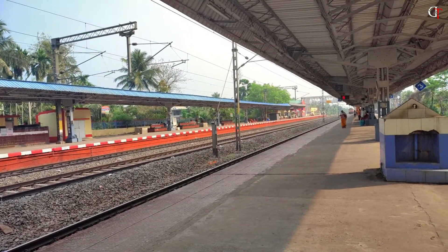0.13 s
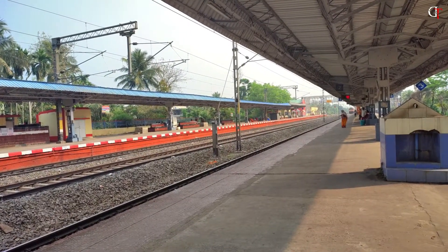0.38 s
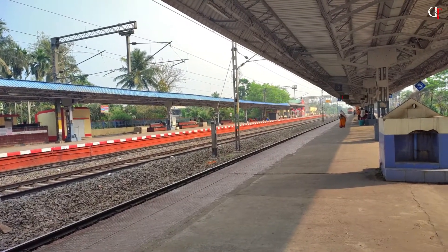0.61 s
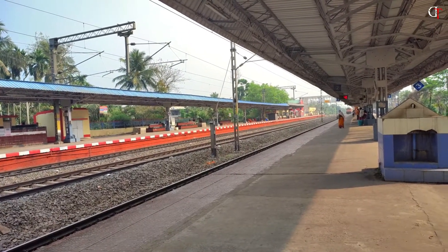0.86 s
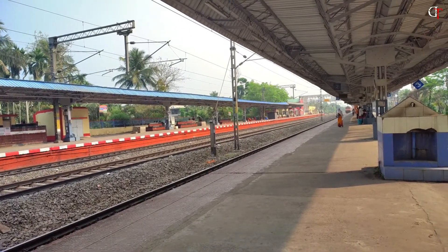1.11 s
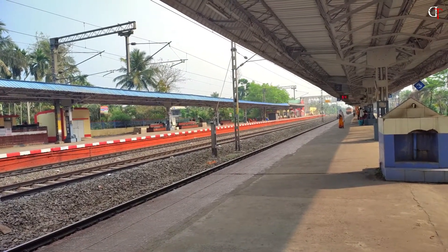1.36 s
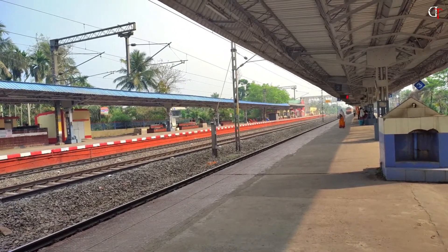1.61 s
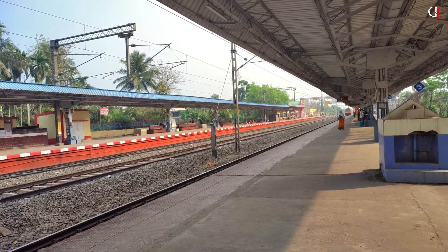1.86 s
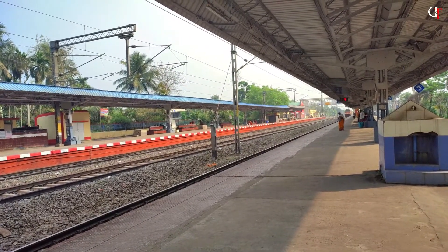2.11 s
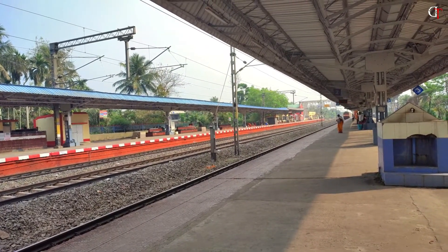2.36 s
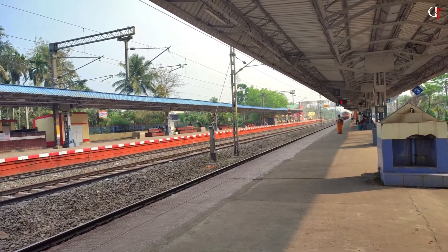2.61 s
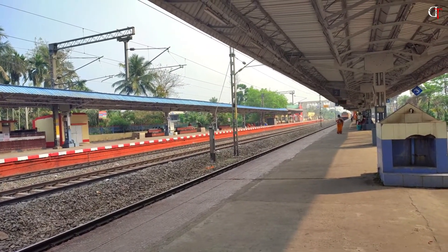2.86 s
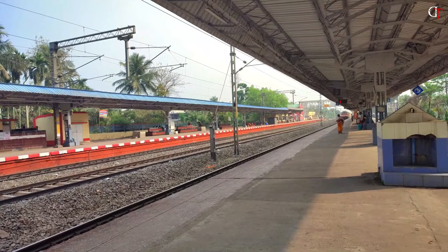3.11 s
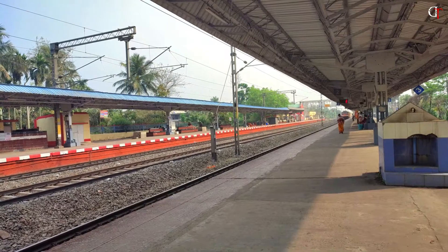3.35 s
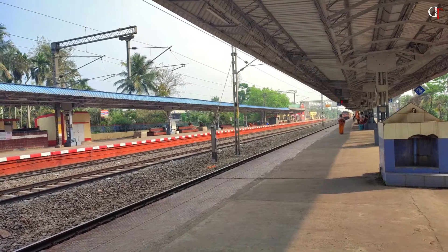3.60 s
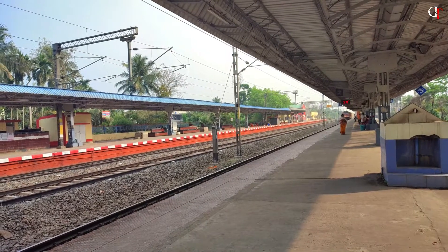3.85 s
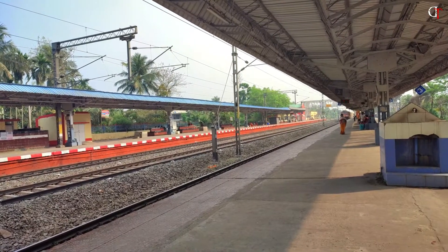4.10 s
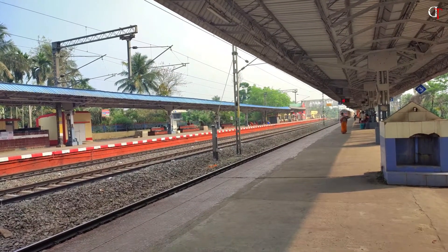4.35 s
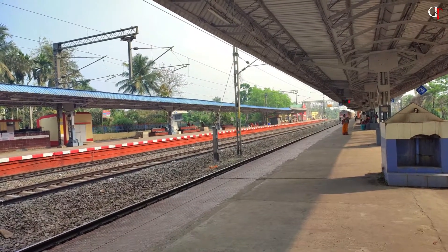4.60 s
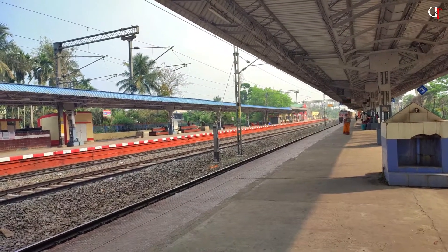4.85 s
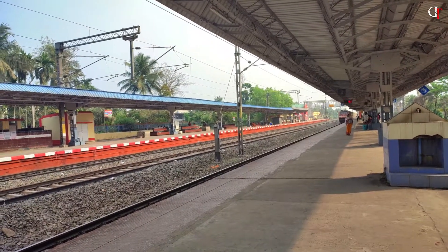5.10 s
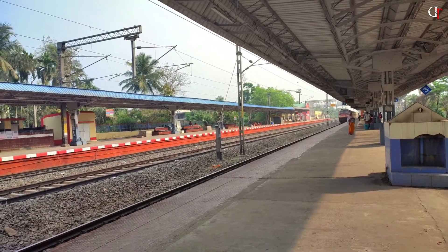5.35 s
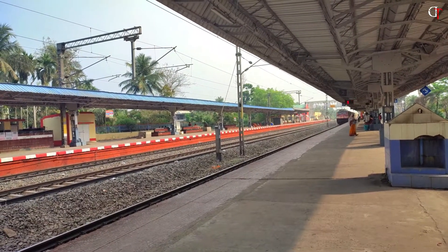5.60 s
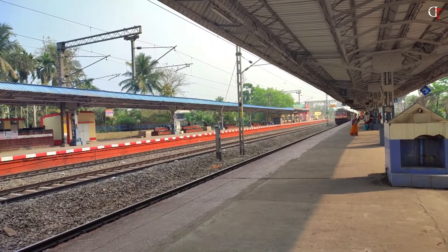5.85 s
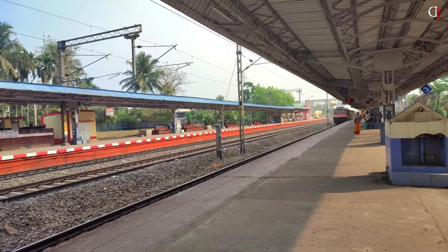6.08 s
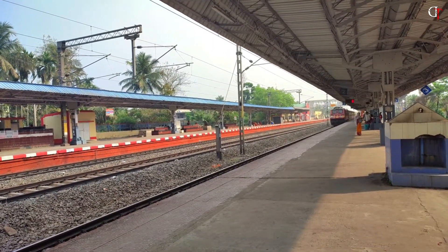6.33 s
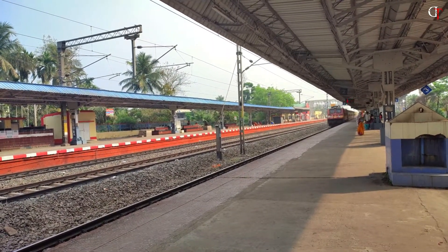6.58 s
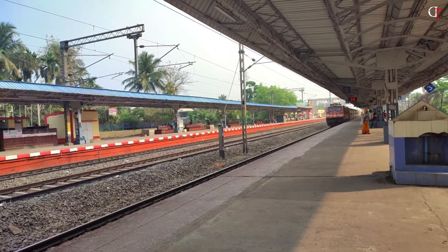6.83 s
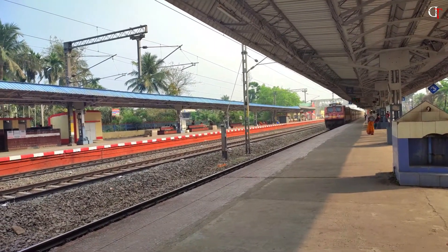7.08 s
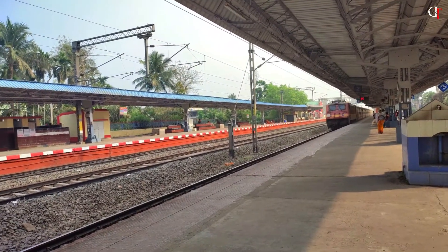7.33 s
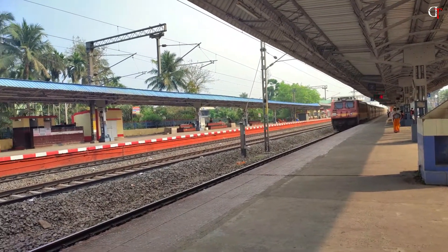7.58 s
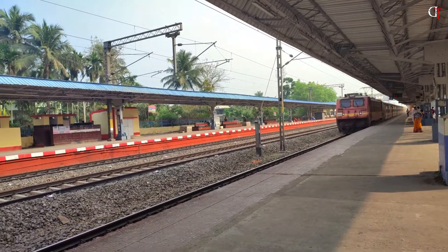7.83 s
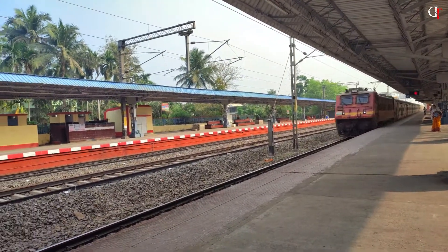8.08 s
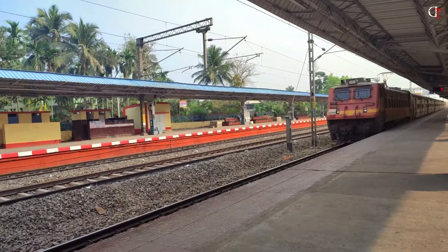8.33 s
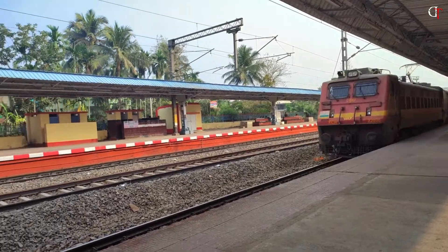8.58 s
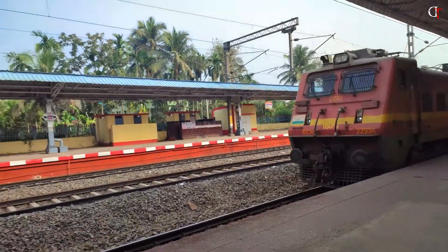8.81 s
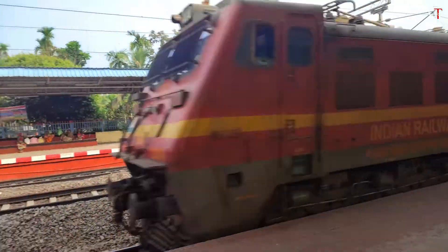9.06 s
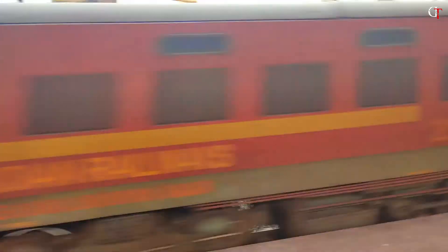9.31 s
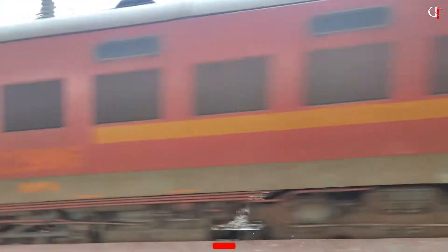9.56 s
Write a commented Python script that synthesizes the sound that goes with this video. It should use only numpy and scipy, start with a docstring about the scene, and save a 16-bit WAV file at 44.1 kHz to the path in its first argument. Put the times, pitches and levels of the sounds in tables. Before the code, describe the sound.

Stereo handheld microphone close to the track at an open-sided station. A single-note train horn, faint and hazy at first, blows again and again, becoming harsh and loud. Between blasts its echo fades into soft track rumble, with a thin high squeal early on. The engine arrives abruptly, the horn cuts off with a small pitch drop, and heavy wheel noise surges, with a wind thump, brief hums and a metallic knock on a rail joint.

```python
"""An air horn is heard first, already sounding: an electric express gives long blasts as it nears a roofed
platform, then roars past. The horn is a harmonic sum whose partials swell and fade as drifting paths interfere;
walls behind the train return a lower echo, and the station adds sparse reflections. Shaped noise makes the
wheels, the far rolling and the wind on the microphones; unsteady sines make a thin squeal and short hums;
damped sines ring where a wheel strikes a rail joint."""
import sys
import numpy as np
from scipy import signal
from scipy.io import wavfile
from scipy.ndimage import uniform_filter1d

SR = 44100
rng = np.random.default_rng(int(sys.argv[2]) if len(sys.argv) > 2 else 0)


def put_to_file(sound):
    """Save the sound as 16-bit audio at rate SR, in the file named by the first command-line argument."""
    columns = np.atleast_2d(sound).T  # one column per channel
    safe = np.clip(columns, -1, 1)
    whole_steps = np.round(safe * 32767)
    wavfile.write(sys.argv[1], SR, whole_steps.astype(np.int16))


def invert_db(x):
    """Field ratio 10**(x/20) for x, a level in decibels (scalar or array-like)."""
    u = np.asarray(x, float) / 20
    return 10 ** u


N = 427329
TIME = np.arange(N) / SR  # s
CONTROL = TIME[::64]  # s, times at which slow changes are computed

# Horn: steady pitch as heard, sinking as the train draws level, with a small rise at the end: t/s, f/Hz
PITCH = [(0, 314.6), (2.8, 314.6), (4.7, 315.0), (8.0, 314.7), (8.6, 314.0), (8.85, 312.6), (9.05, 310.4),
         (9.1, 313), (9.2, 313)]
# Air valve: opening t/s, shutting t/s
VALVE = [(-1, 1.375), (1.495, 2.89), (4.693, 5.155), (5.25, 6.955), (7.033, 9.17)]
# Spectrum of the horn heard from near: partial number, level/dB
BELL_NEAR = [(1, 0), (2, -13), (3, -1), (4, -4), (5, -16), (6, -14), (7, -12.5), (8, -12), (9, -20.5),
             (10, -19), (11, -18), (12, -19), (13, -21.5), (14, -28), (15, -27.5), (16, -31.5), (17, -25.5),
             (18, -30), (19, -22), (20, -20), (21, -20.5), (22, -19.5), (23, -20), (24, -22), (25, -25),
             (26, -24.5), (27, -32.5), (28, -30.5), (29, -32), (30, -28.5), (31, -31), (32, -30.5),
             (33, -30.5), (34, -33), (35, -32), (36, -29), (37, -32), (38, -30.5), (39, -32), (40, -29),
             (41, -38), (42, -36), (43, -35), (44, -35), (45, -32)]
# Spectrum of the horn heard from far: partial number, level/dB
BELL_FAR = [(1, -7), (2, -23), (3, 0), (4, -5), (5, -19), (6, -15), (7, -19), (8, -21), (9, -23.5),
            (10, -21.5), (11, -22), (12, -22.5), (13, -24), (14, -26.5), (15, -33.5), (16, -25),
            (17, -29.5), (18, -27.5), (19, -33.5), (20, -27.5), (21, -29.5), (22, -37), (23, -30.5),
            (24, -36.5), (25, -33.5), (26, -41.5), (27, -41.5), (28, -46), (29, -44), (30, -48), (31, -53),
            (32, -45), (33, -47), (34, -53), (35, -50), (36, -52), (37, -53), (38, -53), (39, -57),
            (40, -58), (41, -58), (42, -61), (43, -60), (44, -58), (45, -56)]
# Horn at full pressure: t/s, level/dB added to the spectrum, blend (0 far, 1 near, above 1 beyond near)
APPROACH = [(0, -25.5, 0), (1.2, -25, .2), (1.6, -23, .1), (2.2, -20, .1), (2.85, -17, .15),
            (4.75, -13, .4), (5.5, -13, .6), (6, -13, .9), (6.7, -14, .75), (7.3, -14, 1), (7.8, -15, 1.3),
            (8.2, -17, 1.2), (8.5, -16, 1.3), (8.9, -15.5, 1.35), (9.05, -16, 1), (9.13, -22, .6),
            (9.2, -34, 1)]
# Partials dip or swell as their paths cancel or add: t/s, partial number, width/s, level change/dB
SWELLS = [(0.0, 18, 0.08, -4.9), (0.2, 4, 0.17, -7.7), (0.27, 25, 0.6, -4.0), (0.3, 6, 0.15, 5.9),
          (0.42, 1, 0.3, -4.8), (0.84, 4, 0.1, -16.0), (0.96, 2, 0.5, -6.1), (0.96, 5, 0.08, 7.3),
          (1.04, 3, 0.1, -11.5), (1.08, 12, 0.6, 5.0), (1.11, 9, 0.08, -5.7), (1.32, 38, 0.3, -2.9),
          (1.55, 1, 0.1, -9.3), (1.99, 3, 0.3, 2.9), (2.1, 2, 0.06, -18.7), (2.16, 7, 0.3, 5.6),
          (2.22, 5, 0.08, -9.8), (2.52, 11, 0.3, -3.2), (2.63, 4, 0.1, 4.1), (2.67, 21, 0.6, -6.4),
          (4.78, 1, 0.06, -5.1), (5.04, 38, 0.3, -4.3), (5.1, 3, 0.02, -10.0), (5.13, 6, 0.6, -3.4),
          (5.31, 4, 0.3, 4.1), (5.34, 1, 0.035, -5.7), (5.37, 10, 0.3, 4.8), (5.4, 3, 0.5, -3.3),
          (5.57, 1, 0.06, -10.0), (5.61, 16, 0.3, -4.0), (5.64, 2, 0.5, -8.1), (5.79, 5, 0.15, -11.2),
          (5.86, 4, 0.035, -7.5), (5.91, 1, 0.06, -12.2), (5.97, 30, 0.15, 3.7), (6.0, 3, 0.035, -6.5),
          (6.03, 1, 0.02, -9.0), (6.17, 1, 0.035, 7.4), (6.21, 6, 0.15, -4.4), (6.21, 10, 0.15, -5.7),
          (6.32, 4, 0.06, -12.5), (6.42, 38, 0.6, -5.2), (6.45, 5, 0.15, 5.3), (6.52, 1, 0.02, -13.0),
          (6.6, 1, 0.5, -7.8), (6.66, 3, 0.02, -6.4), (6.85, 1, 0.02, -12.7), (6.85, 4, 0.02, -12.8),
          (6.85, 4, 0.3, -9.6), (7.13, 3, 0.02, -6.7), (7.13, 4, 0.02, -10.1), (7.32, 11, 0.15, -4.5),
          (7.38, 38, 0.08, 2.2), (7.45, 3, 0.02, -12.2), (7.47, 5, 0.08, 6.2), (7.53, 3, 0.02, -8.4),
          (7.56, 30, 0.08, -1.8), (7.62, 3, 0.3, -10.1), (7.66, 1, 0.17, -8.3), (7.7, 2, 0.5, -8.4),
          (7.78, 3, 0.035, -14.5), (7.81, 1, 0.02, -13.5), (7.82, 4, 0.02, -16.1), (7.93, 3, 0.06, 4.6),
          (8.06, 4, 0.17, 3.1), (8.12, 1, 0.1, 4.0), (8.16, 16, 0.15, -4.8), (8.25, 8, 0.6, -3.5),
          (8.25, 30, 0.08, 3.7), (8.25, 38, 0.6, -6.1), (8.33, 3, 0.035, 3.9), (8.41, 1, 0.02, -11.9),
          (8.52, 14, 0.6, 7.1), (8.57, 1, 0.035, 4.7), (8.57, 4, 0.06, -6.3), (8.61, 3, 0.02, -7.1),
          (8.61, 11, 0.08, -4.7), (8.7, 5, 0.3, 4.1), (8.74, 3, 0.1, -5.0), (8.77, 1, 0.06, -9.9),
          (8.88, 30, 0.15, -4.3), (8.91, 4, 0.02, -8.5), (9.02, 3, 0.02, -6.1), (9.06, 2, 0.035, 11.8),
          (9.06, 6, 0.08, 6.5), (9.12, 1, 0.1, 10.0)]
SWELL_REACH = .02  # a swell spreads over SWELL_REACH x partial^2 neighbours
FILL_S, DRAIN_S, TREBLE_LAG = .018, .04, .03  # loudness follows the valve; high partials need more pressure
SHARP_HZ, SETTLE_S, CLIMB_S = 10.5, .05, .09  # the reed runs sharp at low pressure
OPENING_DB, OPENING_S = 5., .1  # the treble overshoots while the reed settles
# Stereo image of the horn: f/Hz, side against mid level/dB
SIDE_DB = [(60, -6), (98, -6), (160, -8), (260, -36.5), (430, -4), (710, 0.5), (1170, -7.5), (1910, 2),
           (3130, 4.5), (5130, 0.5), (8420, -1), (13800, 0.5)]
# Stereo image of the horn: f/Hz, left minus right level/dB
LEAN_DB = [(60, 1.5), (98, 1.5), (160, 0.5), (260, 1.0), (430, 13), (710, 5.5), (1170, -3), (1910, 1.5),
           (3130, -6), (5130, -14.5), (8420, -3), (13800, -9)]
SCATTER_FAR_DB, SCATTER_NEAR_DB = -9., -3.5  # share of each partial scattered by poles, roof and walls
SCATTER_PASS_DB, SCATTER_PASS_S = 7., .3  # more while the engine draws level
# Echo of the horn: partial number, level/dB against the direct one
ECHO_DB = [(1, -16.5), (2, -13.5), (3, -23.5), (4, -28), (5, -28)]
ECHO_RATIO = .868  # sound sent backwards is lowered as much as the direct sound is raised
# Long scattered paths, heard after the valve shuts: f/Hz, level/dB against the direct horn
LATE = [(300, -6), (650, -5), (950, -17), (1300, -16), (1900, -9), (4000, -9), (8000, -8), (14000, -11)]
LATE_BUILD_S, LATE_FADE_S = .08, .19
# Relative spectrum of the horn's air noise: f/Hz, level/dB
BREATH = [(250, -41), (450, -37.5), (800, -28.5), (1200, -24.5), (1700, -48), (3000, -56), (7000, -49),
          (14000, -70)]
BREATH_DB, HISS_LEAD_S = -26, .025  # against the horn's partials; air hisses before the reed speaks

# Reverberation time of the station: f/Hz, t60/s
STATION = [(300, 1.8), (1000, 1.34), (3000, 1.6), (8000, 1.3), (14000, 0.75)]
# Reflections of the station: f/Hz, level/dB against the direct horn
WET = [(300, -12), (700, -20), (1300, -22), (3000, -15), (8000, -18), (14000, -20)]

# Relative spectrum of wheels and bogies close by: f/Hz, level/dB
ROAR = [(18, -28), (30, -23), (190, -11.5), (320, -6), (525, -12.5), (1290, -11.5), (1450, -13),
        (1650, -17.5), (2100, -13.5), (2600, -20), (6900, -30), (8500, -40), (14400, -45.5)]
# Roar: f/Hz, left-right likeness (-1 to 1)
ROAR_SAME = [(60, 0.68), (180, 1), (530, 0.48), (1570, -0.02), (4650, -0.25), (13800, 0.41)]
# the engine's roar peaks at the nearest point, then dies away quickly
ENGINE_PASS_S, ENGINE_DB, SPEED_M_S, TRACK_M = 9.05, -21, 30., 3.2
ENGINE_GONE_S = .2  # decay time after passing
COACH_S, COACH_RISE_S, COACH_TOP_S, COACH_FALL_S = 9.2, .07, 9.55, .1
COACH_DB, COACH_SWELL_DB_S = -11.5, 16.  # level at its top, and the slope up to it

# Wheel over a rail joint: t/s, peak level/dB
JOINT = [(9.478, -.5)]
# Ringing modes of wheel and rail: f/Hz, relative level/dB, t60/s
RAIL = [(328, -7, 0.061), (520, 4, .07), (900, -1, 0.043), (1460, -11, .04), (2540, -12, .03)]

# Short lines while the coach passes, near the horn's note and one higher: start t/s, length/s, f/Hz, level/dB
HUMS = [(9.22, .12, 309, -17), (9.34, .18, 312, -21), (9.52, .2, 296, -19), (9.625, .07, 715, -12.5)]
# A thin squeal that comes and goes: start t/s, length/s, f/Hz, level/dB
SQUEALS = [(.03, .55, 3262, -38), (.62, .13, 3265, -38), (1.7, .42, 3268, -37), (2.15, .3, 3250, -47),
           (2.45, .47, 3255, -39), (2.98, .3, 3250, -44), (3.22, .2, 3250, -52)]
# A second, higher line rings along with the squeal: frequency ratio, level/dB against the first
SQUEAL_PAIR = (1.127, -10.5)

# Relative spectrum of rails and surroundings: f/Hz, level/dB
FAR = [(90, -29), (150, -11), (260, -8.5), (490, -16), (650, -13), (850, -2.5), (1030, 0), (1370, -6),
       (1560, -20), (2500, -25.5), (5800, -45.5), (6500, -32), (7200, -24), (7800, -59), (10500, -43),
       (13300, -35.5), (14600, -38)]
# Far rolling noise: t/s, level/dB
FAR_LEVEL = [(0, -50), (1.5, -40.5), (3, -38.5), (3.8, -37), (4.6, -36), (6, -33), (7.5, -32.5), (9.7, -34)]
# Far rolling and horn air noise: f/Hz, left-right likeness (-1 to 1)
SAME = [(60, 1), (150, 1), (370, 1), (910, 0.35), (2250, -0.35), (5580, 0.83), (13800, 0.092)]
# Relative spectrum of wind on the microphones: f/Hz, level/dB
WIND = [(20, 5), (45, -2.5), (100, -6.5), (200, -24), (300, -15), (600, -70)]
# Gusts: t/s, width/s, level/dB over the steady wind
GUSTS = [(1.9, .4, 2), (3.6, .7, 2), (5.38, .1, 3), (5.75, .15, 6), (6.3, .15, 4), (7.6, .6, 3),
         (8.87, .13, 16), (9.5, .18, 18)]
WIND_DB = -42.5


def horn():
    """Harmonic synthesis: a reed's partials and pulsed air noise, with multipath fading and a Doppler-lowered echo."""
    hz = reed_pitch()
    k = np.transpose(BELL_NEAR)[0]
    db, near = partial_levels(k)
    overshoot_db = OPENING_DB * np.outer(k / len(k), 1 - pressure(CONTROL, OPENING_S, DRAIN_S))
    level = invert_db(db + overshoot_db) * pressure(CONTROL, FILL_S, DRAIN_S) ** (1 + TREBLE_LAG * k[:, None])
    level = uniform_filter1d(level, size=9, axis=1)
    # a moving source reaches fixed reflectors at slightly lower pitch: a skirt that widens with the partial
    spread_hz = 11.56 * np.minimum(k, 14) ** 0.52
    mid, flare = direct_paths(k, level, near, spread_hz)
    # beyond the direct mid signal, the lowest four partials follow a smoother level
    level[:4] = np.sqrt(uniform_filter1d(level[:4] ** 2, size=40, axis=1) + 1e-12)
    partial_hz = k * hz.mean()
    side = side_signal(partial_hz, mid, level * flare, spread_hz)
    echo = back_echo(hz, level) + late_paths(partial_hz, db, spread_hz)
    return partials(hz, mid, side) + echo + breath(hz, level)


def reed_pitch():
    """Pressure-dependent reed frequency: sharp while pressure builds after opening and again as it drains."""
    hz = curve(PITCH, TIME)[0] + SHARP_HZ * (1 - pressure(TIME, SETTLE_S, CLIMB_S))
    return uniform_filter1d(hz, size=400)


def pressure(t, fill_s, drain_s):
    """Exponential charge and discharge: air pressure 0-1 at the reed as the valve opens and shuts."""
    blasts = []
    for opens, shuts in VALVE:
        filling = 1 - np.exp(-np.maximum(t - opens, 0) / fill_s)
        draining = np.exp(-np.maximum(t - shuts, 0) / drain_s)
        blasts.append(filling * draining)
    return np.max(blasts, axis=0)


def partial_levels(k):
    """Interference of paths: dips and swells in dB on a spectrum blended from far to near."""
    near_db, far_db = np.transpose(BELL_NEAR)[1], np.transpose(BELL_FAR)[1]
    db, near = curve(APPROACH, CONTROL)
    db = db + near_db[:, None] * near + far_db[:, None] * (1 - near)
    for s, partial, width, change_db in SWELLS:
        across = bump(k, round(partial), SWELL_REACH * partial ** 2)
        db += change_db * np.outer(across, bump(CONTROL, s, width))
    return db, near


def direct_paths(k, level, near, spread_hz):
    """Multipath fading: narrow random modulation for drifting paths, wider Doppler skirts for scattering."""
    scatter = invert_db(SCATTER_FAR_DB + (SCATTER_NEAR_DB - SCATTER_FAR_DB) * np.minimum(near, 1)
                  + SCATTER_PASS_DB * bump(CONTROL, ENGINE_PASS_S, SCATTER_PASS_S))
    paths = 1 + 0.5 * drift(per_s=3.5, count=len(k), neighbours=0.3)
    skirt = scatter * drift(spread_hz, count=len(k), below=0.28, neighbours=0.27)
    # the bell smears each pulse a little
    phase = .12 * k ** 2 + (0.6 + .02 * k) * rng.standard_normal(len(k))
    flare = np.exp(1j * phase)[:, None]
    mid = level * flare * (paths + skirt) / np.sqrt(.85 + .7 * scatter ** 2)
    # the lowest four partials keep a steady core under their scattering
    mid[:4] = level[:4] * (1.14 + 0.5 * scatter * drift(1.6 * spread_hz[:4], count=4, below=0.44))
    return mid, flare


def side_signal(partial_hz, mid, flared, spread_hz):
    """Interchannel phase: the microphone ports differ in phase, and the in-phase share tilts the image."""
    share, lean = invert_db(read(SIDE_DB, partial_hz)), invert_db(read(LEAN_DB, partial_hz))
    tilt = (lean ** 2 - 1) / (lean ** 2 + 1)
    cosine = np.clip(tilt * (1 + share ** 2) / (2 * share), -1, 1)
    ports = (share * np.exp(1j * np.arccos(cosine)))[:, None]
    diffuse = flared * drift(0.38 * spread_hz, count=len(spread_hz), below=0.27, neighbours=0.37)
    return ports * (0.74 * mid + 0.8 * diffuse)


def back_echo(hz, level):
    """Doppler effect: sound sent backwards returns from the walls at a lower pitch."""
    back = level[:5] * invert_db(np.transpose(ECHO_DB)[1])[:, None]
    mid = back * drift(per_s=7.4, count=5)
    side = 0.25 * back * drift(per_s=5.0, count=5)
    return partials(hz * ECHO_RATIO, mid, side)


def late_paths(partial_hz, db, spread_hz):
    """Delayed scattering: long paths keep the steady note sounding after the valve shuts."""
    late = uniform_filter1d(invert_db(db), size=30, axis=1) * invert_db(read(LATE, partial_hz))[:, None]
    late = late * pressure(CONTROL, LATE_BUILD_S, LATE_FADE_S)
    share = invert_db(read(SIDE_DB, partial_hz))[:, None]
    mid = late * drift(.75 * spread_hz, count=len(db))
    side = share * late * drift(.75 * spread_hz, count=len(db))
    return partials(curve(PITCH, TIME)[0], mid, side)


def breath(hz, level):
    """Modulated flow noise: air passes once each reed cycle, and hisses slightly ahead of the note."""
    effort = np.interp(TIME, CONTROL, np.sqrt((level ** 2).sum(0)))
    effort = np.maximum(effort, np.interp(TIME + HISS_LEAD_S, TIME, effort))
    puff = 1 + 0.89 * np.cos(2 * np.pi * np.cumsum(hz) / SR)
    return invert_db(BREATH_DB) * effort * puff * noise(BREATH, SAME, patchy_db=3.5)


def partials(hz, mid, side):
    """Fourier series: harmonics of a pitch curve with slow complex mid and side strengths."""
    turn = np.exp(2j * np.pi * np.cumsum(hz) / SR)
    wave, out = np.sqrt(2) * np.ones(N), np.zeros((2, N))
    for m, s in zip(mid, side):
        wave = wave * turn  # the next harmonic
        left = (np.interp(TIME, CONTROL, m + s) * wave).real
        right = (np.interp(TIME, CONTROL, m - s) * wave).real
        out += [left, right]
    return out


def station(x):
    """Reverberation by convolution: sparse reflections of roof, platforms and walls, each band with its own t60."""
    size = 2 * SR
    sparse = rng.random((2, size)) < .04
    delayed = np.arange(size) / SR > .025
    taps = rng.standard_normal((2, size)) * sparse * delayed
    hz, t, z = signal.stft(taps, SR, nperseg=256)
    z = z * invert_db(-60 * t / read(STATION, hz)[:, None])
    energy = np.linalg.norm(signal.istft(z, SR, nperseg=256)[1][0])
    tail = signal.istft(z * invert_db(read(WET, hz))[:, None], SR, nperseg=256)[1] / energy
    return signal.fftconvolve(x, tail, axes=1)[:, :N]


def roar():
    """Inverse-distance law: the engine closes in, passes and dies away, then the first coach rushes by."""
    distance = np.hypot(TRACK_M, SPEED_M_S * np.minimum(TIME - ENGINE_PASS_S, 0))
    engine = invert_db(ENGINE_DB) * TRACK_M / distance
    engine = engine * np.exp(-np.maximum(TIME - ENGINE_PASS_S, 0) / ENGINE_GONE_S)
    coach = invert_db(COACH_DB + COACH_SWELL_DB_S * np.minimum(TIME - COACH_TOP_S, 0))
    coach = coach * np.clip((TIME - COACH_S) / COACH_RISE_S, 0, 1)
    coach = coach * bump(np.maximum(TIME, COACH_TOP_S), COACH_TOP_S, COACH_FALL_S)
    return np.hypot(engine, coach) * noise(ROAR, ROAR_SAME, patchy_db=1.5)


def joint():
    """Modal decay: wheel and rail ring briefly after a blow of a few milliseconds."""
    t, out = TIME[:SR // 5], np.zeros(N)
    ring = sum(invert_db(db - 60 * t / t60) * np.sin(2 * np.pi * hz * t) for hz, db, t60 in RAIL)
    ring = ring * (1 - np.exp(-t / 0.0046))
    for s, db in JOINT:
        out[round(s * SR):][:len(t)] += invert_db(db) * ring / abs(ring).max()
    return out


def hums():
    """Narrow-band tones: short lines heard while the coach passes."""
    return tones(HUMS, edge=.4, waver=.6, flutter=.25, pan_db=3.0)


def squeal():
    """Narrow-band tones: a thin squeal with a second line at a fixed frequency ratio."""
    ratio, db = SQUEAL_PAIR
    higher = [(s, length, hz * ratio, level + db) for s, length, hz, level in SQUEALS]
    return tones(list(SQUEALS) + higher, edge=.9, waver=.6, flutter=.45, pan_db=.1)


def tones(rows, edge, waver, flutter, pan_db):
    """Random phase (waver/rad) and amplitude (flutter) modulation of sines, each swelling in and out once."""
    out = np.zeros(N)
    wobble = np.interp(TIME, CONTROL, drift(per_s=25.0, count=1)[0])
    for start, length, hz, db in rows:
        arch = np.sin(np.pi * np.clip((TIME - start) / length, 0, 1)).clip(0) ** edge
        line = np.cos(2 * np.pi * hz * TIME + waver * wobble.real)
        out += np.sqrt(2) * invert_db(db) * arch * line
    return out * (1 + flutter * wobble.imag) * invert_db([[pan_db / 2], [-pan_db / 2]])


def far_rolling():
    """Filtered random noise: the rails and surroundings under a slow level curve."""
    return invert_db(curve(FAR_LEVEL, TIME)) * noise(FAR, SAME, patchy_db=1.0)


def wind():
    """Turbulent pressure noise: low buffeting on the two microphone ports, rising in gusts."""
    db = WIND_DB + sum(gust_db * bump(TIME, s, width) for s, width, gust_db in GUSTS)
    buffeting = noise(WIND, [(25, 0.44), (130, 0.9)], patchy_db=1.5)  # f/Hz, left-right likeness
    return invert_db(db) * buffeting * invert_db([[.8], [-.8]])


def noise(colour, same, patchy_db):
    """Short-time spectral synthesis: random two-channel spectra with drifting patches, scaled to rms 1."""
    frames, hz = N // 256 + 5, np.fft.rfftfreq(1024, 1 / SR)
    a, b, c, d, patches = rng.standard_normal((frames, 513, 5)).T
    patches = uniform_filter1d(patches, size=12, axis=0)
    patches = evened(uniform_filter1d(patches, size=14, axis=1))
    like = np.clip(read(same, hz), -1, 1)[:, None]
    left = a + 1j * b
    right = like * left + np.sqrt(1 - like ** 2) * (c + 1j * d)
    z = np.array([left, right]) * invert_db(read(colour, hz)[:, None] + patchy_db * patches)
    return evened(signal.istft(z, nperseg=1024, noverlap=768)[1][:, :N])


def drift(per_s, count, below=0., neighbours=0.):
    """Low-pass random process, complex, rms 1 a row; below lowers its centre, neighbours ties rows."""
    shape = (count, len(CONTROL))
    z = rng.standard_normal(shape) + 1j * rng.standard_normal(shape)
    f = np.fft.fftfreq(len(CONTROL), CONTROL[1]) / np.reshape(per_s, (-1, 1)) + below
    z = np.fft.ifft(np.fft.fft(z) / (1 + f ** 2) * np.exp(-.13 * f ** 2))
    z = z + neighbours * (np.roll(z, 1, axis=0) + np.roll(z, -1, axis=0))
    return z / np.sqrt(np.mean(abs(z) ** 2, axis=1, keepdims=True))


def bump(t, s, width):
    """Gaussian law: a bell-shaped rise and fall."""
    return np.exp(-.5 * ((t - s) / width) ** 2)


def evened(x):
    """Mean-square normalisation: scales to rms 1."""
    return x / np.sqrt(np.mean(abs(x) ** 2) + 1e-20)


def read(points, hz):
    """Logarithmic frequency scale: linear interpolation of a spectrum table."""
    f, value = np.transpose(points)
    return np.interp(np.log(hz + 1), np.log(f + 1), value)


def curve(rows, t):
    """Linear interpolation in time of all columns of a table."""
    s, *columns = np.transpose(rows)
    return np.array([np.interp(t, s, c) for c in columns])


def scene():
    """Superposition: the horn in the station, the train near and far, and the wind."""
    blown = horn()
    train = roar() + joint() + hums() + squeal() + far_rolling()
    return blown + station(blown) + train + wind()


def band_limit(x):
    """A steep low-pass at the top of the band."""
    return signal.sosfilt(signal.butter(12, 14400, fs=SR, output="sos"), x)


def record(dry):
    """Soft saturation: the input stage rounds off peaks toward full scale."""
    knee = 0.48
    over = np.maximum(abs(dry) - knee, 0)
    rounded = dry - np.sign(dry) * (over - (1 - knee) * np.tanh(over / (1 - knee)))
    return band_limit(rounded)


dry = scene()
out = record(dry)
put_to_file(out)
```